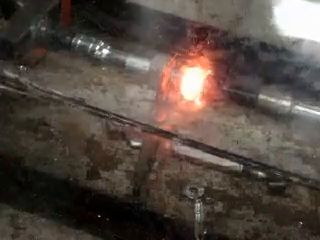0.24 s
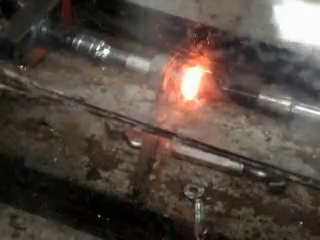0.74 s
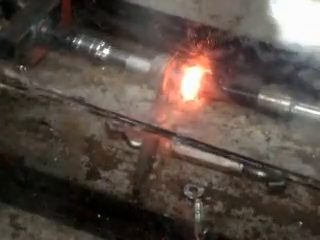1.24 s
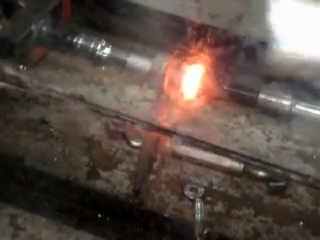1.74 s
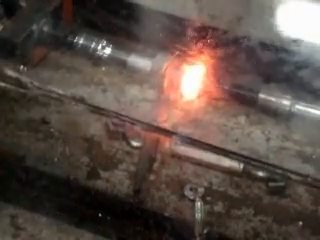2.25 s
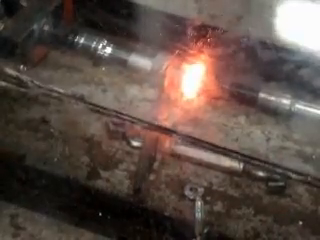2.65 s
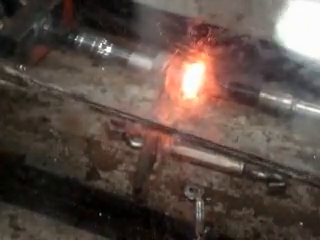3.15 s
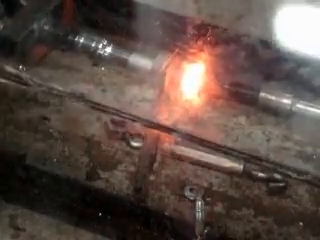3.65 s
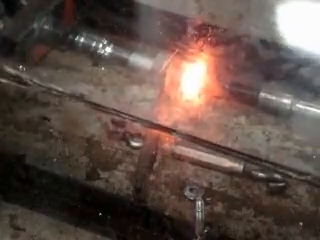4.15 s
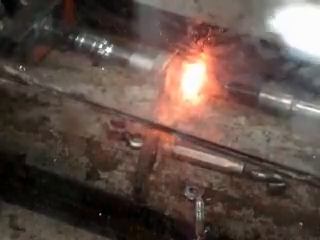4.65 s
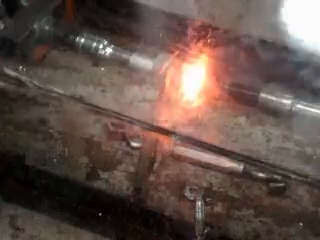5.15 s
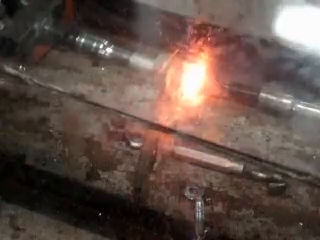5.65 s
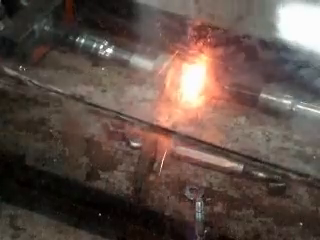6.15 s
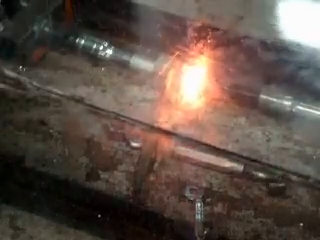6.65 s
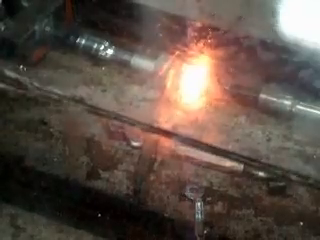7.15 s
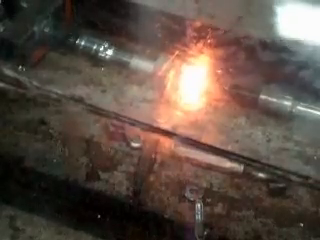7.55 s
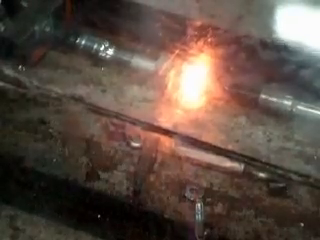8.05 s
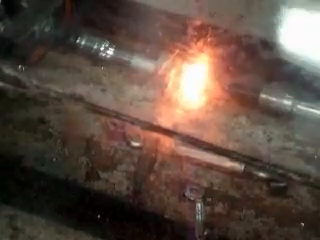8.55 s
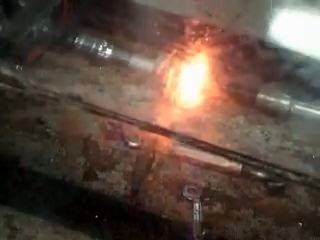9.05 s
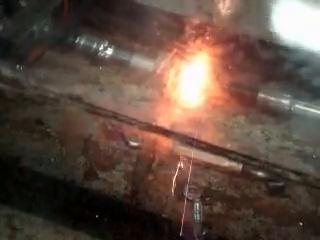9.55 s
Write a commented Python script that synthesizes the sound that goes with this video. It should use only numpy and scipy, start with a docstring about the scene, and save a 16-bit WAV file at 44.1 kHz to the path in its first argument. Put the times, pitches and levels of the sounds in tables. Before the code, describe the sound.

Metal rod spun against metal: a loud sustained screech, ragged and buzzing at first, then cleaner, with harsh scraping swelling midway.

```python
"""A friction welder squeals as its motor spins a steel rod against a fixed one.
Friction drives two bending modes of the rod into a squeal, ragged at first, then cleaner as heat smooths the faces.
The rough faces grind and hiss in a pattern that repeats each turn and drifts; a thin whistle flickers above.
Behind them the machine frame drones and single shaft orders howl up.
The harder the faces bite, the louder they grind and the more the squeal is choked."""
import sys
import numpy as np
from scipy import signal
from scipy.fft import rfft, irfft, next_fast_len
from scipy.io import wavfile
from scipy.ndimage import uniform_filter1d

SR = 44100
rng = np.random.default_rng(int(sys.argv[2]) if len(sys.argv) > 2 else 0)


def pcm_store(signal):
    """Save signal as 16-bit PCM."""
    levels = np.round(np.clip(np.atleast_2d(signal), -1, 1) * 32767)
    wavfile.write(sys.argv[1], SR, levels.astype(np.int16).T)


N = 432621

# layer levels: (dB at mean bite, dB per dB of bite)
MAIN_LAW, TWIN_LAW, OVERTONE_LAW = (-18.3, -0.2), (-20, -0.91), (-29, -0.49)
LOW_LAW, MIDDLE_LAW, HISS_LAW = (-40.5, 1.0), (-24, 1), (-22, 0.35)
WHISTLE_LAW = (-40.5, 0.5)
# heat smooths the faces: raggedness (0-1) falls from 1 to a rest, and the pitch scatter with it
HEATING_S, HOT_RAGGED, RAGGED_SCATTER_HZ = 4.42, 0.12, 21
# drift of the faces' ripples, before each layer's factor: on smooth faces, and extra when ragged
WEAR_SMOOTH_RAD_PER_TURN, WEAR_RAGGED_RAD_PER_TURN = 0.4997, 0.24
# a high spot drags the squeal down once a turn: depth, share of the squeal (0-1), decay time of the share
DRAG_HZ, DRAG_SHARE, DRAG_FADE_S = 429.8, 0.15, 4.2
# the stiff faces snag early on: centre, extra share and its spread, extra depth and its spread
SNAG_S, SNAG_SHARE, SNAG_SHARE_SPREAD_S = 0.39, 0.47, 0.23
SNAG_HZ, SNAG_DEPTH_SPREAD_S = 290, 0.13
# the main mode takes over briefly: centre, spread, its gain, gain of twin and sidebands
LOCK_S, LOCK_SPREAD_S, LOCK_MAIN_DB, LOCK_OTHERS_DB = 7.27, 0.13, 1.5, -4
# steady part of the second and third harmonic, and its rise with a flare
CLEAN_SECOND, CLEAN_THIRD, CLEAN_PER_DB = 0.4, 0.25, 0.15
# once-a-turn phase wobble of the slipping: on smooth faces, and extra when ragged
WOBBLE_SMOOTH_RAD, WOBBLE_RAGGED_RAD = 0.2, 0.9
# gain control: reference level, averaging time, share of a level change that it takes out
HOLD_DB, AVERAGE_S, GAIN_SHARE = -13, 0.16, 0.63


def undb(db):
    """Decibels to gain."""
    return 10 ** (np.asarray(db) / 20)


def law_db(law, bite):
    """Level of a layer at this bite."""
    return law[0] + law[1] * bite


def curves(table):
    """Columns of a timed table, one value per sample."""
    time_s, *columns = np.transpose(table)
    return [np.interp(np.arange(N) / SR, time_s, column) for column in columns]


def bell(at_s, spread_s):
    """Gaussian swell from 0 to 1 and back around at_s."""
    return np.exp(-0.5 * ((np.arange(N) / SR - at_s) / spread_s) ** 2)


def walk(rate_hz):
    """Smooth random signal of rms 1 that changes about rate_hz times a second."""
    k = max(int(SR / rate_hz), 1)
    steps = np.repeat(rng.standard_normal(N // k + 1), k)[:N]
    return unit(uniform_filter1d(steps, k))


def unit(x):
    """Scale to rms 1."""
    return x / np.sqrt(np.mean(np.abs(x) ** 2))


def filtered(x, response):
    """Filter by a function of frequency; the result is analytic (complex), its real part has rms 1."""
    size = next_fast_len(N)
    # the small offset avoids 0 Hz
    spectrum = rfft(x, size) * response(np.fft.rfftfreq(size, 1 / SR) + 1e-3)
    return np.sqrt(2) * unit(np.fft.ifft(spectrum, size)[:N])


def colour(x, points):
    """Shape the spectrum of x by (Hz, dB) points on a log frequency axis."""
    hz, db = np.transpose(points)
    return filtered(x, lambda f: undb(np.interp(np.log(f), np.log(hz), db)))


def ring(x, modes):
    """Pass x through parallel resonances of (Hz, width Hz, dB)."""
    def response(f):
        return sum(undb(db) / (1 + 1j * (f * f - hz * hz) / (f * width_hz)) for hz, width_hz, db in modes)
    return filtered(x, response)


def saturate(z, knee):
    """Friction feeds a vibration only up to a limit, so its swing evens out."""
    return np.sqrt(2) * unit(z / np.sqrt(knee ** 2 + np.abs(z) ** 2))


def surface(turns, wear, count=256, size=2048):
    """Roughness under the turning rod: each turn repeats the last, its ripples shifted a little by wear."""
    wear_per_turn = np.interp(np.arange(int(turns[-1]) + 2), turns, wear)[:, None]
    shifts = wear_per_turn * rng.standard_normal((len(wear_per_turn), count))
    phases = 2 * np.pi * rng.random(count) + np.cumsum(shifts, axis=0)
    track = irfft(np.exp(1j * phases), size).ravel()
    return unit(np.interp(turns * size, np.arange(len(track)), track))


def ripples(turns, wear):
    """Slow ripples of the faces as a modulation to both sides, centred on shaft order 20, steady part removed."""
    orders = filtered(surface(turns, wear), lambda f: f < 2000) * np.exp(-2j * np.pi * 20 * turns)
    return orders - uniform_filter1d(orders, SR // 46)


def squeal(turns, bite, ragged):
    """Sticking and slipping bends the rod's swing into rough harmonics, which follow a moment later."""
    # the rod sticks harder and its overtones flare: (time [s], spread [s], level [dB])
    flares = [(.03, 0.097, 6.5), (.82, .24, 7), (7.053, .17, 4), (7.702, .4, 2), (9.1, .17, 2.5)]
    flare_db = sum(db * bell(at_s, spread_s) for at_s, spread_s, db in flares)
    swing, twin = rod_swing(turns, bite, ragged)
    wobble_rad = (WOBBLE_SMOOTH_RAD + WOBBLE_RAGGED_RAD * ragged) * np.sin(2 * np.pi * turns)
    # the twin mode takes an extra part in the sticking
    sticking = swing + 0.3 * (1 - ragged) * twin
    slip = saturate(sticking, knee=0.3) * np.exp(1j * wobble_rad)
    rough = unit(ripples(turns, 0.598 + 0.29 * ragged))

    def roughen(steady):
        return (steady + rough) / np.sqrt(steady ** 2 + 0.5)

    clean = CLEAN_PER_DB * flare_db
    second = ring((slip ** 2 * roughen(CLEAN_SECOND + clean)).real, [(5300, 470, 0)]).real
    third = ring((slip ** 3 * roughen(CLEAN_THIRD + clean)).real, [(7870, 650, 0)]).real
    overtones = second * undb(-3.0) + third * undb(-10.0)
    late = overtones[np.maximum(np.arange(N) - SR // 270, 0)]
    flicker_db = (1.7 + 1.2 * ragged) * walk(110)
    return swing.real + late * undb(law_db(OVERTONE_LAW, bite) + flare_db + flicker_db)


def rod_swing(turns, bite, ragged):
    """Bending modes sing, shaken into sidebands by the turning faces; gives the whole swing and the twin mode."""
    # squeal pitch: (time [s], frequency [Hz])
    pitch = [(0, 2758), (1.7, 2756), (3.9, 2778), (5.05, 2779), (6, 2804), (7, 2773), (7.7, 2742),
             (8.6, 2738), (9.05, 2751), (9.4, 2742)]
    # the squeal loses its grip: (time [s], half length [s], share lost [0-1])
    slips = [(4.29, .06, .9), (4.97, .025, .9), (5.06, .02, .9), (5.7, .27, .4), (6.88, .12, .25)]
    # sideband spectrum: (frequency [Hz], level [dB])
    sideband_colour = [(200, -74.5), (1500, -36.5), (2200, -18.5), (2340, 3), (2500, 3), (2620, 0.5),
                       (2750, 11), (2870, 2.5), (3050, -18), (3400, -8.5), (4300, -24.5)]
    pitch_hz, = curves(pitch)
    depth_hz, share = drag()
    scattered_hz = pitch_hz + RAGGED_SCATTER_HZ * ragged * walk(150)
    tone = np.exp(2j * np.pi * np.cumsum(scattered_hz) / SR)
    # the off-centre rod presses harder once a turn, unevenly while the faces are ragged
    once_a_turn = 1 + (0.35 + 0.18 * ragged) * np.cos(2 * np.pi * turns)
    pressure = once_a_turn * undb(2.8 * ragged * walk(45))
    t = np.arange(N) / SR
    grip = 1 - sum(lost * np.exp(-((t - at_s) / half_s) ** 4) for at_s, half_s, lost in slips)
    main = np.sqrt(2) * unit(tone * pressure)
    # the twin mode, a narrow resonance, favours the nearest of the lower sidebands
    lower = sum(tone * np.exp(-2j * np.pi * (k * turns + rng.random())) for k in range(1, 5))
    twin_mode = [(2650, 52, 0)]
    twin = saturate(ring(ring(lower.real, twin_mode).real, twin_mode), knee=0.62)
    lock = bell(LOCK_S, LOCK_SPREAD_S)
    main_db = law_db(MAIN_LAW, bite) + LOCK_MAIN_DB * lock
    twin_db = law_db(TWIN_LAW, bite) + LOCK_OTHERS_DB * lock - 6.7 * ragged ** 0.6
    beat = grip * (main * undb(main_db) + twin * undb(twin_db))
    # slow ripples of the faces scatter every beat to both sides
    scattered = saturate(beat, knee=0.068) * ripples(turns, 0.14 + 0.36 * ragged)
    sidebands = colour(scattered.real, sideband_colour) * undb(-20.5 + LOCK_OTHERS_DB * lock)
    # the high spot holds the rod back: the pitch sags and recovers every turn
    sag_shape = 0.5 - 0.5 * np.cos(2 * np.pi * turns + 0.15 * walk(60))
    sag_hz = sag_shape * depth_hz * undb(0.8 * walk(45))
    sagging = np.exp(2j * np.pi * np.cumsum(pitch_hz - sag_hz + 70 * walk(400)) / SR)
    with_octave = sagging + undb(-13.5) * sagging ** 2
    dragged = with_octave * undb(-12.5 + 1.0 * walk(160))
    swing = beat * (1 - 0.39 * share) + (1 - share) * sidebands + np.sqrt(share) * dragged
    # friction cannot feed the widest swings
    return undb(1.0) * swing / np.sqrt(1 + np.abs(swing / 0.56) ** 2), twin


def drag():
    """Depth [Hz] and share of the high spot's drag: strong while the faces snag, then the share wears away."""
    worn_share = DRAG_SHARE * np.exp(-np.arange(N) / SR / DRAG_FADE_S)
    depth_hz = DRAG_HZ + SNAG_HZ * bell(SNAG_S, SNAG_DEPTH_SPREAD_S)
    return depth_hz, np.clip(worn_share + SNAG_SHARE * bell(SNAG_S, SNAG_SHARE_SPREAD_S), 0, 1)


def grinding(turns, bite, wear):
    """Rough spots tear across each other: a scrape, and a hiss that surges with the turn."""
    # spectra of low scrape, middle scrape and hiss: (frequency [Hz], level [dB])
    low_colour = [(60, -55.5), (125, -42.5), (210, -7), (400, -3.5), (650, 2.5), (850, -1.5), (1200, -14),
                  (2500, -35)]
    middle_colour = [(150, -64), (400, -36.5), (700, -18), (950, -5.5), (1350, 0.5), (1750, -1), (2300, 0),
                     (3000, 0), (4200, -8.5), (8000, -49.5)]
    hiss_colour = [(150, -56), (900, -32), (2000, 2.5), (3000, 8), (3600, -1), (4400, -3), (5200, 2),
                   (6000, -1), (6900, -7), (8100, -8), (9200, -11.5), (10200, -22)]
    surge_db = 1.0 * np.sin(2 * np.pi * turns) + 0.69 * np.sin(4 * np.pi * turns)
    # freshly torn metal adds noise that never repeats
    scrape = unit(surface(turns, wear) + 2 * wear * rng.standard_normal(N)) * undb(1.3 * walk(60))
    hiss = unit(surface(turns, wear) + 2.6 * wear * rng.standard_normal(N))
    surging = hiss * undb(surge_db + 0.96 * walk(90) + 0.57 * walk(28))
    low = colour(scrape, low_colour).real * undb(law_db(LOW_LAW, bite))
    middle = colour(scrape, middle_colour).real * undb(law_db(MIDDLE_LAW, bite))
    high = colour(surging, hiss_colour).real * undb(law_db(HISS_LAW, bite))
    return low + middle + high


def whistle(turns, bite, wear):
    """Roughness excites high modes of the rods: a thin, flickering whistle."""
    # rod resonances: (frequency [Hz], width [Hz], level [dB])
    joint_modes = [(5810, 90, 0.5), (8390, 140, -2), (8840, 72, -11), (9800, 70, 3)]
    whistling = ring(surface(turns, 2 * wear), joint_modes).real
    return whistling * undb(law_db(WHISTLE_LAW, bite) + 3 * walk(30))


def frame(turns, wear):
    """Lasting unevenness of the faces shakes the machine's resonances; single shaft orders howl up for a while."""
    # frame resonances: (frequency [Hz], width [Hz], level [dB])
    frame_modes = [(222.6, 10, -14.5), (245, 41, -13.5), (353.6, 29, -1.5), (421, 26, -4.5), (600, 32, -13),
                   (754, 30, -12), (946, 46, 3), (1177, 58, 4.5), (1346, 46, -0.5), (1722, 95, 0)]
    # drone level before the common lift: (time [s], level [dB])
    drone = [(0.1, -60), (2.13, -42), (2.61, -45), (3.25, -44), (4.19, -52), (4.51, -42), (7.83, -52),
             (9.0, -45.5), (9.7, -49)]
    # swelling orders: (shaft order [per turn], time of peak [s], spread [s], level [dB])
    howls = [(7, 2.3, 0.33, -49), (7, 4.7, 0.17, -46), (9, 5.5, 0.45, -38), (11, 4.8, .8, -50),
             (13, 2.2, 0.28, -41), (15, 4.85, 0.71, -39.5), (19, 4.8, .45, -38), (26, 4.6, .25, -34.5),
             (27, 4.1, 0.75, -34), (27, 5.55, 0.12, -27), (28, 4.7, 0.62, -29.5), (29, 5.95, 0.2, -39),
             (33, 4.8, 0.31, -43)]
    bass_db, = curves(drone)
    lift_db = 6.5
    out = ring(surface(turns, 0.553 * wear), frame_modes).real * undb(bass_db + lift_db)
    for order, at_s, spread_s, db in howls:
        swell = bell(at_s, spread_s) * undb(db + 2.2 * walk(22))
        phase = 2 * np.pi * (round(order) * turns + rng.random()) + 0.34 * walk(25)
        out += swell * np.sqrt(2) * np.sin(phase)
    return out


def scene():
    """One shaft drives every layer; the bite of the faces sets levels, and heat smooths the faces."""
    # shaft speed: (time [s], speed [turns/s])
    shaft_speed = [(0, 41.6), (.8, 42.2), (2.1, 45.7), (3.4, 47.5), (4.15, 48.1), (4.6, 48.85),
                   (5.4, 48.25), (6.1, 48.1), (6.85, 47.1), (7.65, 44.95), (8.85, 44.9), (9.15, 45.4),
                   (9.6, 44.2)]
    # bite of the faces, as the level of their scrape: (time [s], level [dB])
    bite_levels = [(0.04, -36.5), (0.25, -31), (1.15, -30.5), (1.55, -28), (4.56, -22.5), (5.56, -22.5),
                   (6.83, -28.5), (7.32, -27.5), (7.43, -31), (8.05, -29.5), (8.29, -31), (9.0, -27.5),
                   (9.68, -29.5), (9.76, -26.5)]
    speed, = curves(shaft_speed)
    turns = np.cumsum(speed) / SR
    scrape_db, = curves(bite_levels)
    bite = scrape_db - scrape_db.mean()
    still_cold = np.exp(-(np.arange(N) / SR / HEATING_S) ** 2)
    ragged = np.clip(HOT_RAGGED + (1 - HOT_RAGGED) * still_cold, 0, 1)
    wear = WEAR_SMOOTH_RAD_PER_TURN + WEAR_RAGGED_RAD_PER_TURN * ragged
    rods = squeal(turns, bite, ragged) + grinding(turns, bite, wear) + whistle(turns, bite, wear)
    return (rods + frame(turns, wear))[None]


def record(dry):
    """A small recorder: gain control, rounded peaks, no bass, a steep cut at the top."""
    loudness = np.sqrt(uniform_filter1d(dry ** 2, int(AVERAGE_S * SR)))
    held = dry * (undb(HOLD_DB) / loudness) ** GAIN_SHARE
    rounded = np.tanh(0.9 * held) / 0.83
    thin = signal.sosfilt(signal.butter(7, 165, "high", fs=SR, output="sos"), rounded)
    return signal.sosfilt(signal.ellip(12, 0.2, 80, 10100, fs=SR, output="sos"), thin)


dry = scene()
out = record(dry)
pcm_store(out)
```